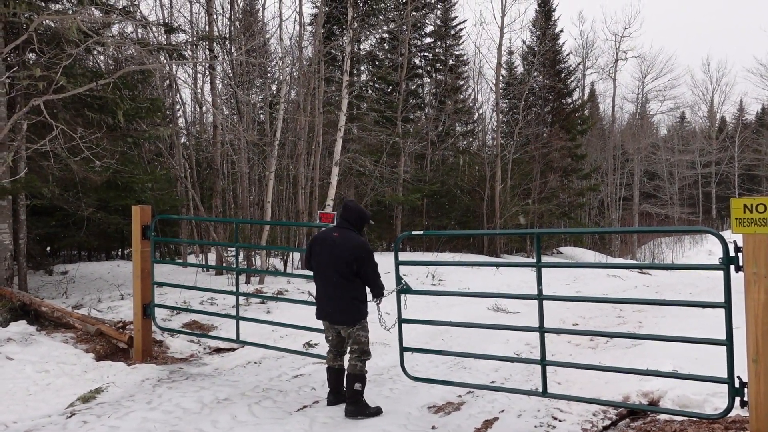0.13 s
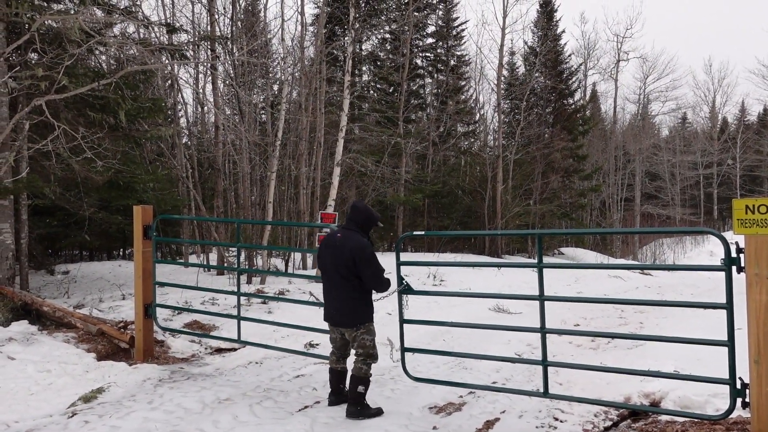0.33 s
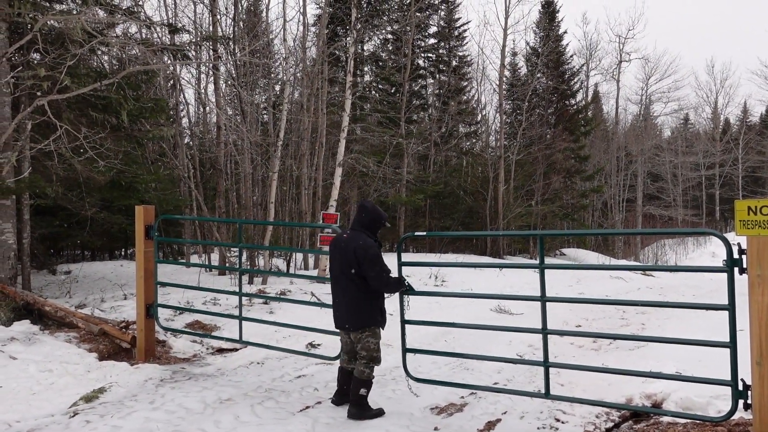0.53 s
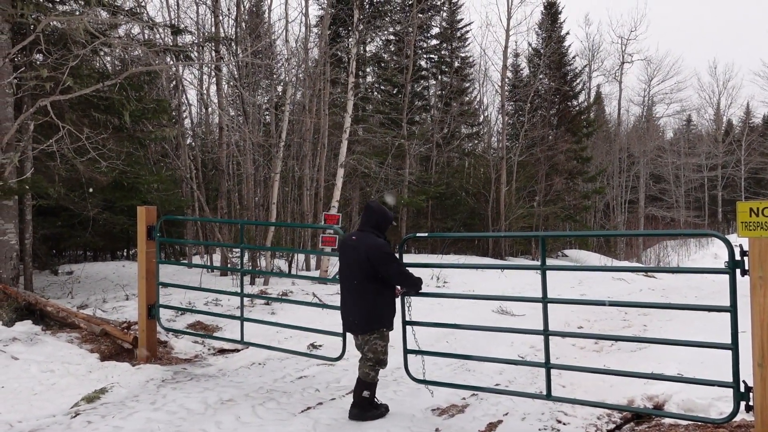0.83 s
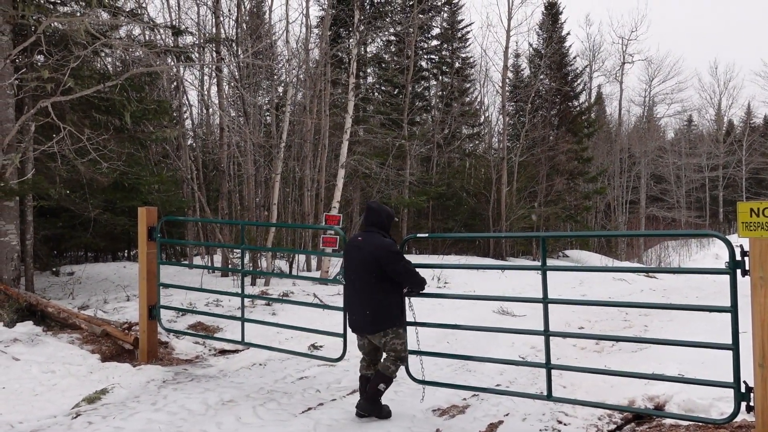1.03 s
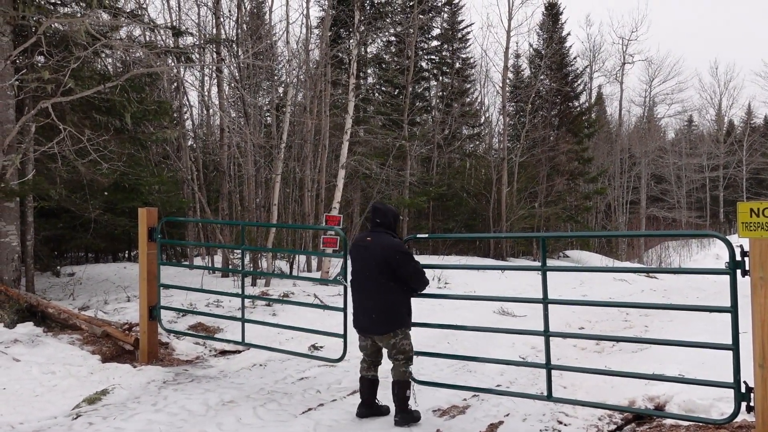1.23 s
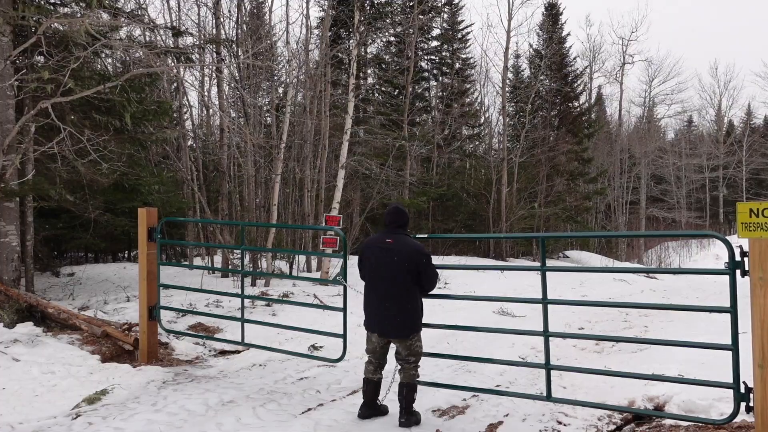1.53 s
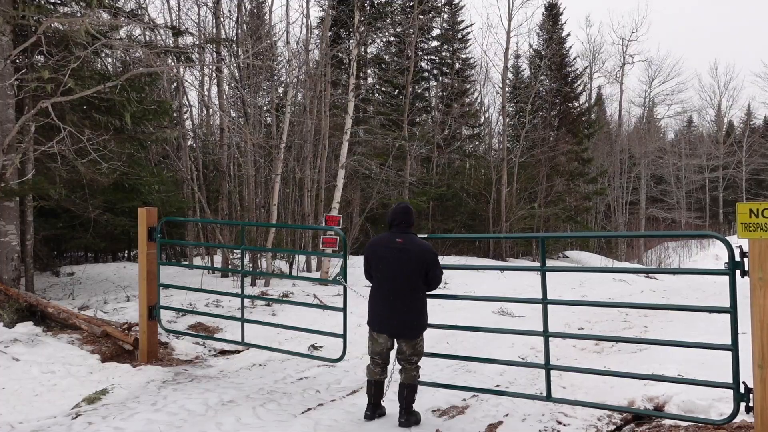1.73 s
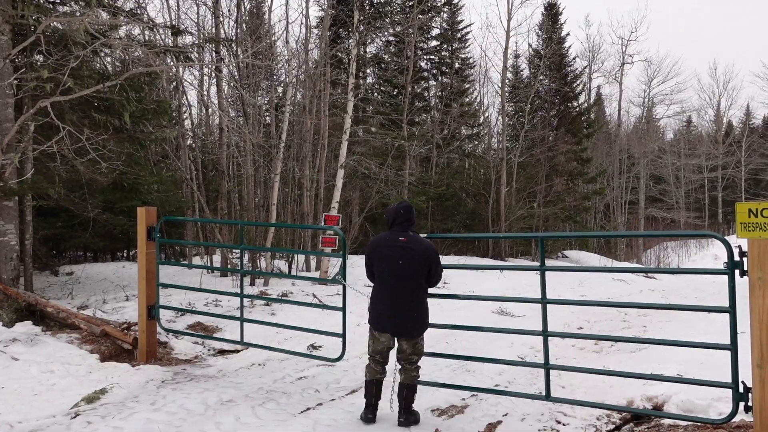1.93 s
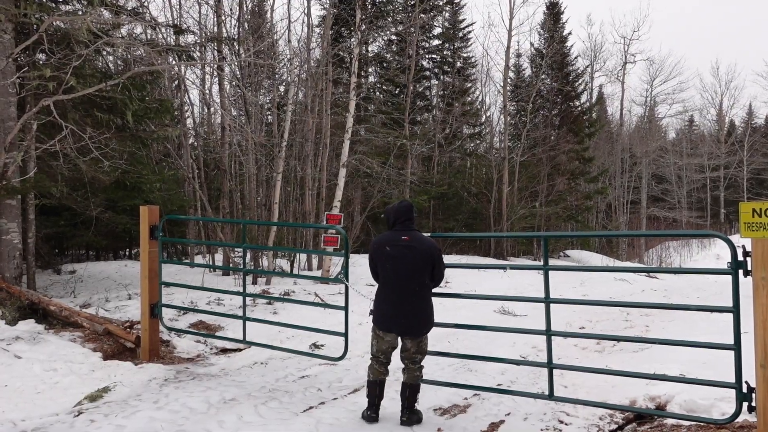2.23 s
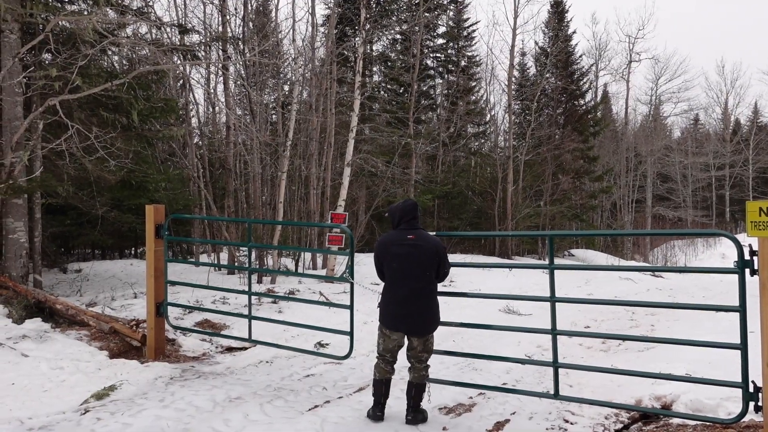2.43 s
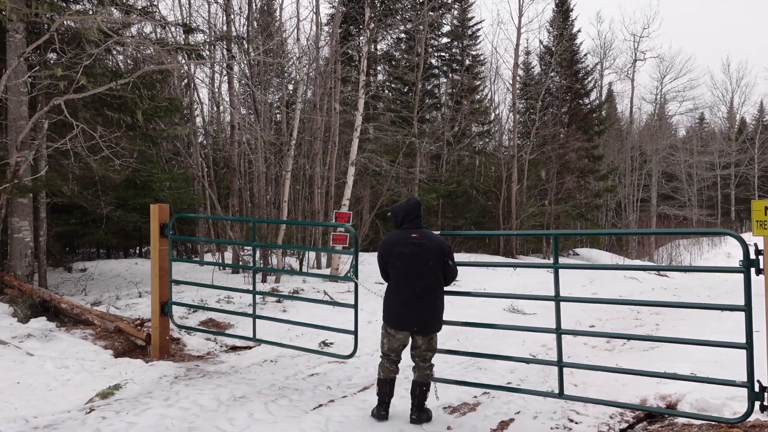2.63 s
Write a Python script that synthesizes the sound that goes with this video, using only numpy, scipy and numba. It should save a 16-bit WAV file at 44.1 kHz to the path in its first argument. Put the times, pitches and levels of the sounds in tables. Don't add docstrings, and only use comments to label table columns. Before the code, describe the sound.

Metal chain jingles, scrapes and knocks on ringing hollow steel gate tubes outdoors, with faint boot steps

```python
import sys
import numpy as np
from scipy import signal
from scipy.fft import rfft, irfft
from scipy.io import wavfile
from scipy.ndimage import uniform_filter1d
from numba import njit

SR = 44100
rng = np.random.default_rng(int(sys.argv[2]) if len(sys.argv) > 2 else 0)


def ratio(d):
    e = np.asarray(d, float) / 20
    return 10 ** e


def digitize_waveform(pressure):
    field = np.atleast_2d(pressure).T
    bounded = np.clip(field, -1, 1)
    quanta = np.round(bounded * 32767).astype(np.int16)
    wavfile.write(sys.argv[1], SR, quanta)


N = 123480

# frequency in Hz, level in dB per Hz.
FLOOR_COLOUR = [(18, -47.5), (30, -18.5), (192, 1.5), (1400, 4), (1870, 1), (3880, 0.5), (9430, -19.5),
                (12300, -19), (15500, -34)]
FLOOR_DB, STIR_DB = -52, -6
WIDTH, BASS_WIDTH = 0.24, 0.4

ECHO_DB, ECHO_T60_S, ECHO_START_S = -36, 0.5, 0.052

# start in seconds, level in dB.
BOOT_STEPS = [
    (0.19, -44),
    (0.629, -46),
    (0.805, -36),
    (1.281, -27),
    (1.322, -40.5),
    (1.627, -39),
    (1.677, -42),
]
STEP_HZ, STEP_T60_S = 215, 0.025
SNAP_S, SNAP_DB, SNAP_HZ, SNAP_T60_S = 1.8748, -30.5, 1180, 0.026
HUM_HZ, HUM_DB = 217, -57

# frequency in Hz, left minus right in dB.
PAN_CURVE = [(700, -0.5), (2400, 0.24), (4400, -2.5), (8000, -1.5), (12000, 0.4)]
PAN_SCATTER_DB = 1.02

# start in seconds, level in dB.
LINK_CLINKS = [(0.0253, -39), (0.1356, -32.5), (0.1913, -13.5), (0.2653, -12.5), (0.302, -9.5),
               (0.3648, -15.5), (0.4113, -20), (0.4517, -14.5), (0.4803, -5), (0.4973, -3), (0.5105, -6),
               (0.5415, -29), (0.5556, -7), (0.5713, -6), (0.6263, -31), (0.8225, -30.5), (0.8873, -32),
               (1.007, -27.5), (1.0908, -13.5), (1.1596, -25), (1.246, -30), (1.4025, -31), (1.5187, -37),
               (1.638, -29.5), (1.6482, -26.5), (1.674, -27), (1.747, -38), (1.782, -40), (1.8507, -24),
               (1.8628, -18.5), (1.916, -15.5), (1.9383, -36), (2.0643, -37.5), (2.4623, -36.5)]
# start in seconds, level in dB.
CHAIN_TICKS = [(0.189, -18), (0.209, -20), (0.227, -23.5), (0.262, -40), (0.2663, -15), (0.2756, -23),
               (0.29, -22.5), (0.303, -27), (0.818, -30.5), (0.847, -29), (1.0888, -23), (1.6382, -23.5),
               (1.647, -25), (1.861, -32.5)]
# time in seconds, level in dB.
JINGLE_CURVE = [
    (.2, -15.5),
    (.4, -21),
    (.45, -23.5),
    (.5, -29),
    (.63, -20.5),
    (.7, -60),
]
# time in seconds, level in dB.
SWAY_CURVE = [
    (1.62, -42),
    (1.72, -40),
    (1.84, -44.5),
    (1.9, -23),
    (1.97, -52),
]
JINGLE_DB, CLINK_DB, TICK_DB = -2, -10.5, -6

LINK_PITCHES = [11262, 11732, 12030, 12075, 12130, 12193, 12247, 12450, 12505, 13060]
# level in dB, t60 in seconds.
LINK_MODES = [(-5, 0.538), (3.5, 0.18), (-15.5, .4), (5, 0.55), (-12, .4), (-4, 0.268), (-2, .3),
              (8.5, 0.43), (-15.5, 0.23), (-9.5, 0.442)]
LINK_KEEP = 0.84
LINK_CROWD_DB, LINK_CROWD_T60_S = -24, 0.13

# start in seconds, level in dB,
# favoured frequency of the struck spot in Hz, brightness in dB per octave.
TUBE_KNOCKS = [(0.3782, -9.5, 4800, 3), (0.385, -4.5, 6940, 1), (0.415, -5, 6060, 16),
               (0.4294, -7, 6160, 16), (0.5192, -2, 6230, 13), (0.5434, -5, 4350, 33),
               (0.7102, -10, 4110, -4), (0.8706, -21.5, 1940, -10.5), (0.845, -28, 2900, 3),
               (0.955, -27.5, 3730, -10), (1.01, -29, 2940, -8.5), (1.1149, -18, 1820, -2.5),
               (1.1653, -17.5, 1780, -5), (1.1905, -9, 1840, 0.5), (1.1975, -8.5, 7050, 13),
               (1.276, -20, 1820, -15), (1.2895, -12, 4000, 2.5), (1.3405, -13.5, 4300, -3.5),
               (1.3841, -12, 2740, -0.5), (1.4019, -8.5, 4600, 8.5), (1.4379, -10.5, 1574, -6.5),
               (1.5831, -20.5, 2140, -6.5), (1.6452, -25.5, 3000, -7.5), (1.6985, -40, 1620, -17)]
# start in seconds, level in dB,
# favoured frequency of the struck spot in Hz, brightness in dB per octave.
BAR_KNOCKS = [(2.068, -36, 3700, -7), (2.084, -20, 1660, -6.5), (2.11, -16.5, 2560, -4.5),
              (2.1359, -13.5, 4580, -3.5), (2.1602, -12, 4700, -1.5), (2.2141, -9, 1734, -4),
              (2.2486, -22, 3400, -7), (2.3181, -22, 1820, -7.5), (2.4548, -22, 2130, -5.5),
              (2.4695, -9.5, 4100, -2.5), (2.478, -13, 5460, -2.5), (2.4947, -15, 2120, -5),
              (2.5584, -29, 2140, -13.5), (2.695, -32.5, 3000, -10), (2.735, -43.5, 3000, -2)]
# time in seconds, level in dB.
DRAG_CURVE = [
    (0.42, -5),
    (0.466, -6),
    (0.52, -6),
    (0.58, -4.5),
    (0.64, -8.5),
    (0.69, -16.5),
]
DRAG_DB, DRAG_TILT = -7.5, 2

TUBE_PITCHES = [1276, 1600, 1658, 1824, 2120, 2431, 2659, 3151, 3784, 4301, 4462, 5071, 5718, 6135]
# level in dB, t60 in seconds.
TUBE_MODES = [(-4.5, 0.46), (-1.5, 0.67), (-3, 0.84), (-1, 0.87), (4, 0.18), (2, 0.69), (0.5, 0.32),
              (-2.5, 0.42), (1, 0.58), (-4, 0.81), (0, 0.46), (-4, .42), (4.5, 0.43), (-3.5, 0.17)]
BAR_PITCHES = [1233, 1600, 1825, 2116, 2430, 2859, 3400, 3730, 3806, 4000, 4360, 4462, 5060, 5432]
# level in dB, t60 in seconds.
BAR_MODES = [(-8.5, 0.68), (-2.5, 0.56), (-7.5, 0.53), (1.5, 0.33), (-3.5, 0.82), (-7, 0.2), (8, 0.21),
             (0.5, 0.61), (2, 0.97), (1.5, 0.5), (5, 0.58), (10, 0.35), (0.5, 0.39), (0.5, 0.53)]
TUBE_DB, BAR_DB = -5, -3.5

# frequency in Hz, level in dB, t60 in seconds.
EARLIER_MODES = [(786, -18, 1.3), (1175, -11, 4.8), (1275, -8, 1.2), (1590, -8.5, 3.9), (1820, -1, 1.5),
                 (2410, -13.5, 1.4), (2550, -6.5, 0.69), (3980, -7, .4), (4000, -12, 1.2), (3900, -5, 0.32),
                 (4570, -4.5, .3), (5150, -8, .5), (5080, -11, .4)]
EARLIER_DB = -35.5

# frequency in Hz, level in dB.
CROWD_COLOUR = [(750, -31), (1150, -6), (1450, -10.5), (1770, -1.5), (3530, 4), (5920, 2), (9500, -13.5),
                (12500, -34), (15500, -35)]
CROWD_DB, CROWD_COUNT, TUBE_KEEP = 0.5, 560, 0.96
CROWD_T60_S, T60_SLOPE, T60_SPREAD = 0.48, -0.15, 0.085
CLANK_SHARE = 0.25

SPOT_DB = 5
FAVOUR_DB, FAVOUR_OCT = 8, 0.12
CRACK_DB, CRACK_S = -23, 0.00047
TWIN_SHARE, TWIN_DB = 0.004, -4
BOUNCE_S, BOUNCE_DB = 0.006, -2.5


def along(table, hz):
    p = np.array(table, float)
    return np.interp(np.log(hz), np.log(p[:, 0]), p[:, 1])


def shaped(table, channels):
    spectrum = rfft(rng.standard_normal((channels, N)))
    hz = np.arange(N // 2 + 1) * SR / N + 1
    x = irfft(spectrum * ratio(along(table, hz)), N)
    return x / x.std()


def band(x, low_hz, top_hz):
    return signal.sosfilt(signal.butter(3, [low_hz, top_hz], "band", fs=SR, output="sos"), x)


@njit
def ring(at, gain, pole, pan, keep, n):
    out = np.zeros((2, n))
    for m in range(len(pole)):
        z, k = 0j, 0
        for i in range(n):
            z *= pole[m]
            while k < len(at) and at[k] <= i:
                z = keep * z + gain[k, m]
                k += 1
            out[0, i] += pan[m] * z.imag
            out[1, i] += z.imag / pan[m]
    return out


def struck(hits, hz, db, t60, spot_db, keep=0.99):
    hits = hits[np.argsort(hits[:, 0])]
    favour = FAVOUR_DB * np.exp(-(np.log2(hz / hits[:, 2:3]) / FAVOUR_OCT) ** 2)
    tilt = hits[:, 3:] * np.log2(hz / 3500)
    spot = spot_db * rng.standard_normal((len(hits), len(hz)))
    shape = ratio(db + favour + tilt + spot)
    gain = ratio(hits[:, 1:2]) * shape / np.sqrt((shape ** 2).sum(axis=1, keepdims=True))
    gain = gain * np.sign(rng.standard_normal(gain.shape)) * (1.39 + 0j)
    pan = ratio((along(PAN_CURVE, hz) + PAN_SCATTER_DB * rng.standard_normal(len(hz))) / 2)
    pole = np.exp((2j * np.pi * hz - np.log(1000) / np.maximum(t60, 0.02)) / SR)
    at = (hits[:, 0] * SR).astype(np.int64)
    return ring(at, gain, pole, pan, min(float(keep), 1.0), N)


def scatter(curve, db, tilt, count):
    c, u = np.array(curve, float), rng.random((count, 3))
    start = c[0, 0] + u[:, 0] * (c[-1, 0] - c[0, 0])
    level = np.interp(start, c[:, 0], c[:, 1]) + db - 2.2 * np.log(u[:, 1])
    favoured_hz = 1500 * 5 ** u[:, 2]
    return np.c_[start, level, favoured_hz, np.full(count, tilt)]


def bounced(hits):
    late = -BOUNCE_S * np.log(rng.random((len(hits), 3))).ravel()
    more = np.repeat(hits, 3, axis=0)
    level = more[:, 1] + BOUNCE_DB - 8.7 * late / BOUNCE_S
    return np.r_[hits, np.c_[more[:, 0] + late, level, more[:, 2:]]]


def twinned(modes):
    m = np.array(modes, float)
    twin_hz = m[:, 0] * (1 + TWIN_SHARE * (2 * rng.random(len(m)) - 1))
    return np.r_[m, np.c_[twin_hz, m[:, 1] + TWIN_DB, 0.8 * m[:, 2]]]


def cracks(hits, fade_s, low_hz, top_hz):
    push = np.zeros(N)
    np.add.at(push, (hits[:, 0] * SR).astype(int), ratio(hits[:, 1]))
    envelope = signal.lfilter([1], [1, -np.exp(-1 / (fade_s * SR))], push)
    return band(envelope * rng.standard_normal(N), low_hz, top_hz)


def air():
    mid, side = shaped(FLOOR_COLOUR, channels=2)
    opposite = np.array([[1], [-1]])
    x = mid + WIDTH * side * opposite
    x = x + BASS_WIDTH * band(side, 19.8, 300) * opposite
    steps = np.repeat(rng.standard_normal(N // 4000 + 1), 4000)
    stir = uniform_filter1d(steps, size=4000)[:N]
    low = band(x, 20, 350)
    return ratio(FLOOR_DB) * (x + low * (ratio(STIR_DB * stir) - 1))


def trees(near):
    a = np.arange(SR // 2) / SR
    tail = rng.standard_normal((2, len(a))) * 1000 ** (-a / ECHO_T60_S) * (a > ECHO_START_S)
    tail = signal.lfilter([1], [1, -0.6], tail)
    tail = tail / np.sqrt((tail[0] ** 2).sum())
    return ratio(ECHO_DB) * signal.fftconvolve(near.mean(axis=0)[None], tail, axes=1)[:, :N]


def hinge():
    hum = signal.lfilter(*signal.iirpeak(HUM_HZ, 11.0, fs=SR), rng.standard_normal(N))
    swing = np.interp(np.arange(N) / SR, [0.5, 0.62, 1.25, 1.35], [0, 1, 1, 0])
    return ratio(HUM_DB) * hum / hum.std() * swing


def boots():
    t, out = np.arange(N) / SR, 0
    for start, db in BOOT_STEPS:
        a = np.maximum(t - start, 0)
        envelope = (1 - np.exp(-a / 0.0016)) * 1000 ** (-a / STEP_T60_S)
        out = out + 2 * ratio(db) * np.sin(2 * np.pi * STEP_HZ * a) * envelope
    a = np.maximum(t - SNAP_S, 0)
    return out + ratio(SNAP_DB) * np.sin(2 * np.pi * SNAP_HZ * a) * 1000 ** (-a / SNAP_T60_S)


def chain():
    clinks = np.array(LINK_CLINKS, float)
    flat = 0 * clinks[:, 0]
    clinks = bounced(np.c_[clinks, 50 + flat, flat])
    jingle = scatter(JINGLE_CURVE, JINGLE_DB, 0, count=60)
    sway = scatter(SWAY_CURVE, JINGLE_DB, 0, count=30)
    u = rng.random(70)
    crowd = np.c_[11100 + 2100 * u, LINK_CROWD_DB + 0 * u, LINK_CROWD_T60_S + 0 * u]
    hz, db, t60 = np.r_[twinned(np.c_[LINK_PITCHES, LINK_MODES]), crowd].T
    chime = struck(np.vstack([clinks, jingle, sway]), hz, db, t60, 5.0, LINK_KEEP)
    ticks = cracks(np.array(CHAIN_TICKS, float), 0.0014, 3500, 12000)
    return ratio(CLINK_DB) * band(chime, 10900, 13500) + ratio(TICK_DB) * ticks


def tube_crowd():
    u = rng.random((CROWD_COUNT, 2))
    hz = 500 + 15000 * np.linspace(0, 1, CROWD_COUNT) ** 1.5 * (0.99 + 0.02 * u[:, 0])
    t60 = CROWD_T60_S * (hz / 2000) ** T60_SLOPE * np.exp(T60_SPREAD * (2 * u[:, 1] - 1))
    t60[::3] *= CLANK_SHARE
    db = along(CROWD_COLOUR, hz) + 5 * np.log10(hz / 4000)
    db[::3] += 3.58
    return hz, db, t60


def earlier_ring(hz, db, t60):
    clear = struck(np.array([[0.0016, EARLIER_DB, 50, 0.014]]), *twinned(EARLIER_MODES).T, 0)
    wash = struck(np.array([[0.0014, -42.5, 50, -1.5]]), hz[::2], db[::2], 1.41 * t60[::2], SPOT_DB)
    low_hz = 600 + 290 * rng.random(24)
    low = struck(np.array([[0.00056, -49.5, 50, 0.0028]]), low_hz, 0 * low_hz, 4.3 + 0 * low_hz, SPOT_DB)
    return band(clear + wash + low, 450, 15500)


def clear_modes(knocks, modes, db):
    soft = np.c_[knocks[:, :3], np.clip(knocks[:, 3], -6, 3)]
    return ratio(db) * struck(soft, *twinned(modes).T, 2.15)


def gate():
    drag = scatter(DRAG_CURVE, DRAG_DB, DRAG_TILT, count=110)
    first = bounced(np.vstack([TUBE_KNOCKS, drag]))
    last = bounced(np.array(BAR_KNOCKS, float))
    hits = np.r_[first, last]
    hz, db, t60 = tube_crowd()
    body = ratio(CROWD_DB) * struck(hits, hz, db, t60, SPOT_DB, TUBE_KEEP)
    body = body + clear_modes(first, np.c_[TUBE_PITCHES, TUBE_MODES], TUBE_DB)
    body = body + clear_modes(last, np.c_[BAR_PITCHES, BAR_MODES], BAR_DB)
    contact = ratio(CRACK_DB) * cracks(hits, CRACK_S, 1180, 7200)
    return ratio(-13) * band(body, 670, 15800) + earlier_ring(hz, db, t60) + contact


def scene():
    near = gate() + chain()
    return near + trees(near) + boots() + hinge() + air()


def roll_off(x):
    return signal.sosfilt(signal.butter(12, 16130, fs=SR, output="sos"), x)


def record(dry):
    mix = signal.sosfilt(signal.butter(2, 75, "high", fs=SR, output="sos"), dry)
    mix = signal.sosfilt(signal.ellip(8, 0.2, 70, 16000, fs=SR, output="sos"), mix)
    return roll_off(mix)


dry = scene()
out = record(dry)
digitize_waveform(out)
```